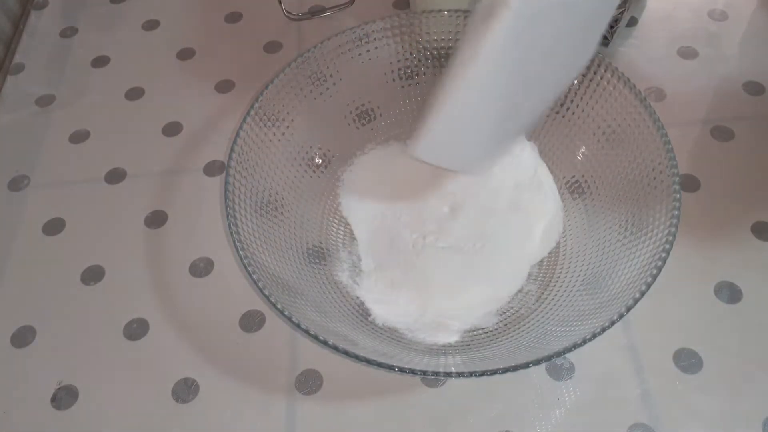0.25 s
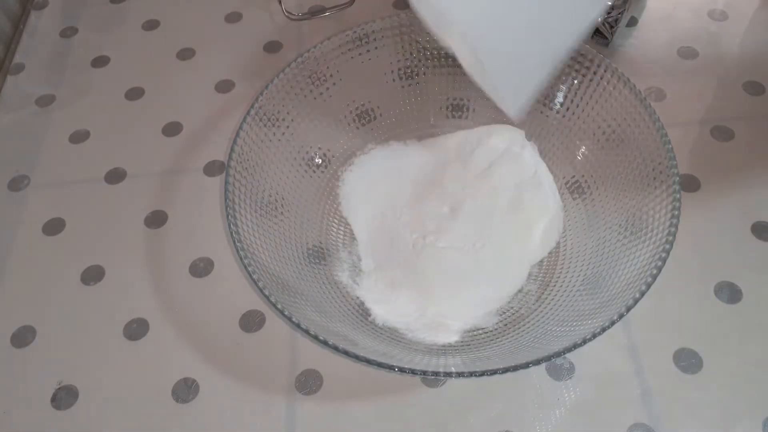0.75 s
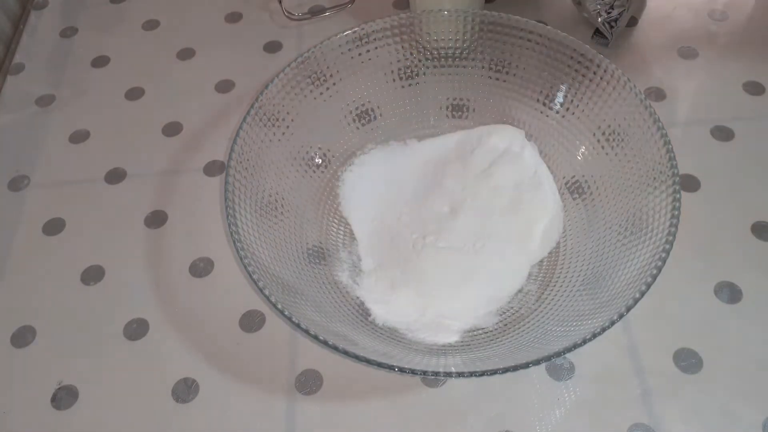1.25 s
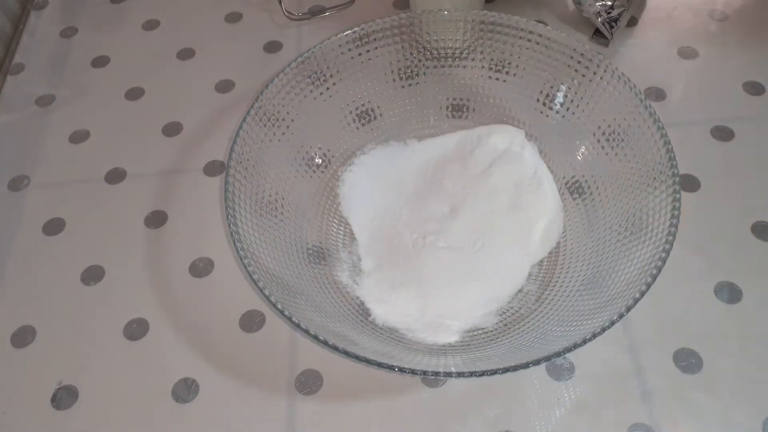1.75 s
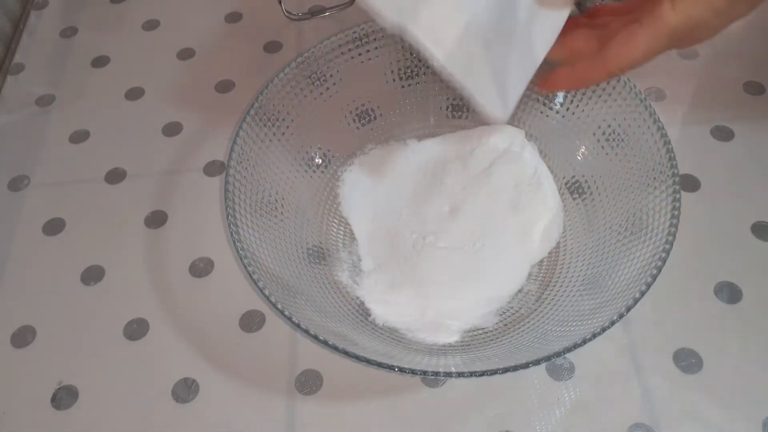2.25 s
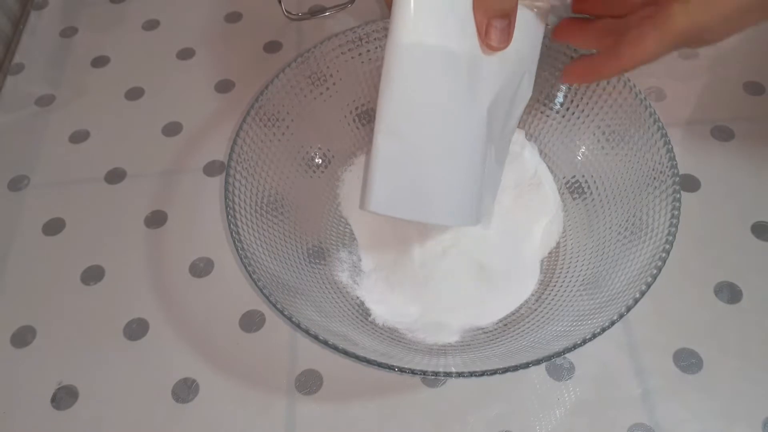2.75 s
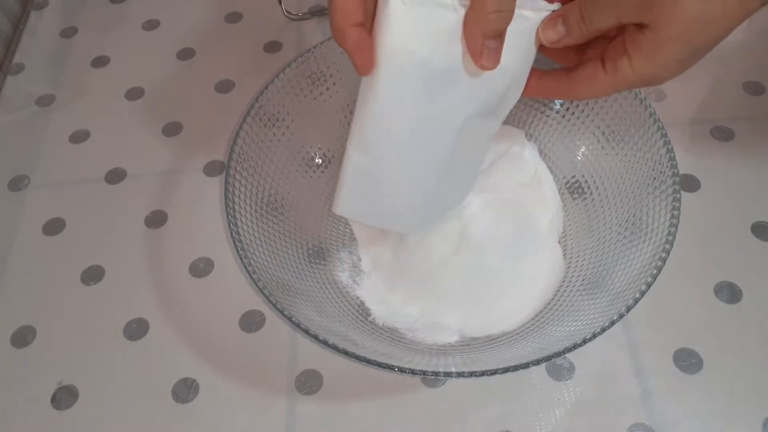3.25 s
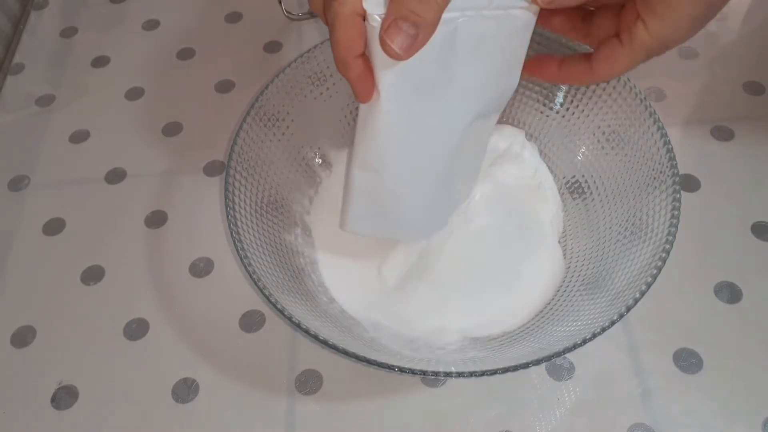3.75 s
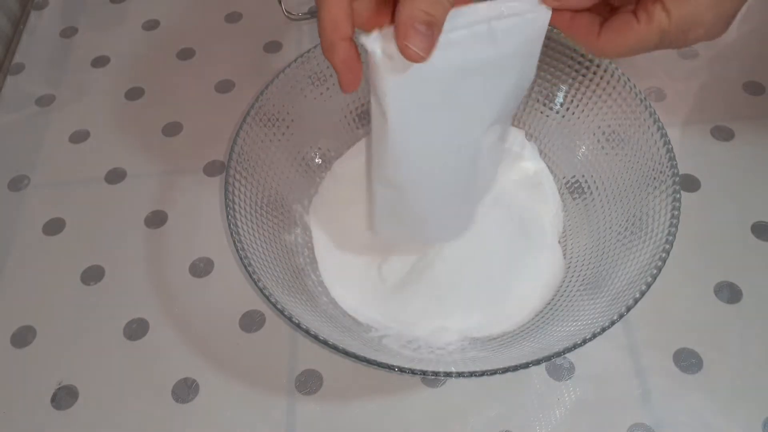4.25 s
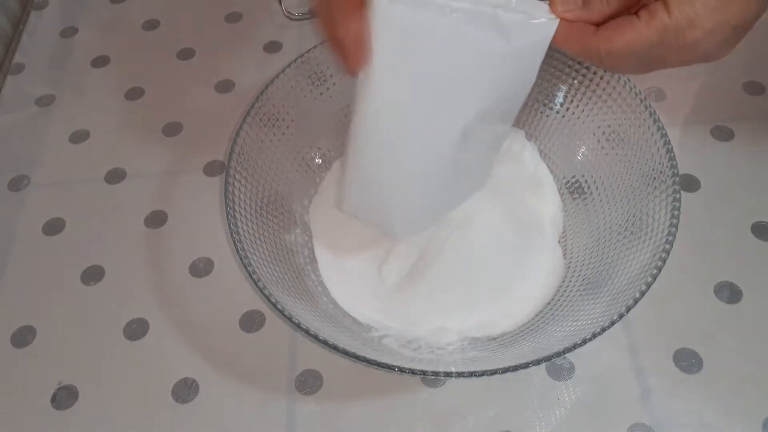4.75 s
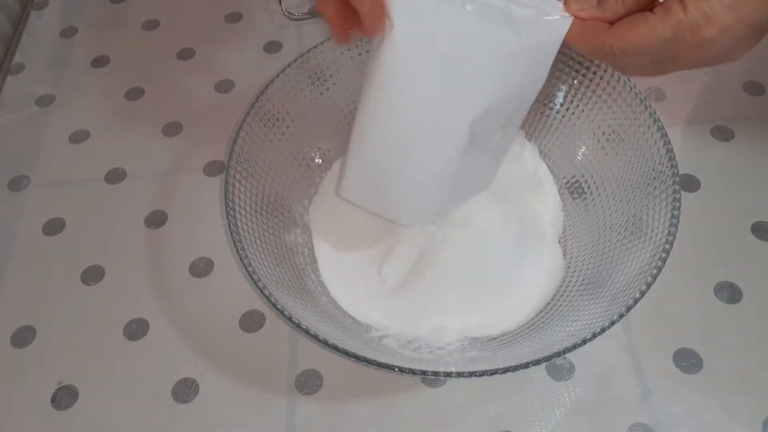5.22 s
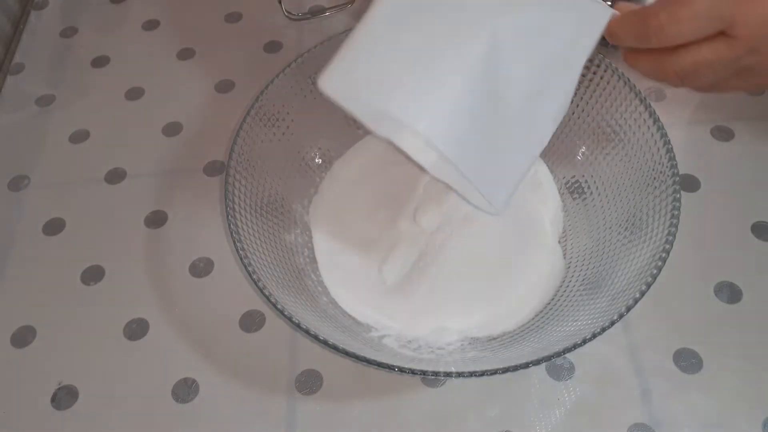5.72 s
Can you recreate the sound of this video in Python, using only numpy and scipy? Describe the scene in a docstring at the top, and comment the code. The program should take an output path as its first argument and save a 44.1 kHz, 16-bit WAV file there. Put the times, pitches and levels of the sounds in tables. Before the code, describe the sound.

A close stereo microphone in a small hard kitchen picks up stiff paper over a steady, low mains hum of about 100 Hz with soft air noise. From 0 to 0.5 s an emptied sachet gives short rubs, dull pops and a tight cluster of crisp cracks. It lands on the table at about 1.3 s, edge first with a light tick, then flat at 1.47 s with a duller pat and slight skid. A faint finger drag follows. From 1.9 s a second sachet rustles; fine powder slides briefly, then streams from 2.3 to 4.2 s as a soft, very high, fluctuating hiss dotted with small crinkles and pops. At 4.5-4.65 s a brisk cluster of pops and snaps breaks out, then spaced, louder crackles from 4.9 to 5.5 s. The strongest sharp snaps come around 5.7 s, with a few thin crackles near 5.9 s. Each snap has a short room tail.

```python
"""Stiff paper crackles: a sachet is emptied into a glass bowl on a kitchen table, a second picked up, poured, shaken out.
Creases crack as short impulses through damped panel resonances, panels pop dully, the empty sachet lands on the table.
Fingers and walls rub in runs of tiny random slips; fine powder slides out as high filtered noise.
A small hard room answers each snap with decaying noise; a mains appliance hums throughout as sines over soft air noise."""
import sys
import numpy as np
from scipy import signal
from scipy.fft import rfft, irfft, next_fast_len
from scipy.io import wavfile
from scipy.ndimage import uniform_filter1d

SR = 44100
rng = np.random.default_rng(int(sys.argv[2]) if len(sys.argv) > 2 else 0)


def store_wav(level_fs):
    """Save 16-bit WAV to argv[1]."""
    pcm = np.round(np.clip(np.atleast_2d(level_fs), -1, 1) * 32767)
    wavfile.write(sys.argv[1], SR, pcm.T.astype(np.int16))


N = 263762
TIME = np.arange(N) / SR

# Edges of a snap's body, mid, bite and top bands: (frequency [Hz])
SNAP_BANDS_HZ = np.array([200, 800, 2200, 5500, 16000])
SNAP_CENTRES_HZ = np.sqrt(SNAP_BANDS_HZ[1:] * SNAP_BANDS_HZ[:-1])
# The empty sachet lands beside the bowl, one edge and then flat:
# (time [s], level before band offsets [dB], sharpness [steps], panel resonance [Hz])
LANDINGS = [(1.3262, -37, 1.0, 5660), (1.466, -31, -0.089, 450)]


def undb(db):
    """Amplitude ratio: 20 dB is a factor of ten."""
    return 10 ** (np.asarray(db) / 20)


def along(points, size):
    """Interpolation on a logarithmic frequency axis: a (Hz, value) table read at the bins of a transform."""
    hz, value = np.transpose(points)
    bins_hz = np.fft.rfftfreq(size, 1 / SR)
    return np.interp(np.log(bins_hz + 1), np.log(hz), value)


def colour(x, points):
    """Linear filtering: the spectrum is multiplied by the gains of a (Hz, dB) table."""
    length = x.shape[-1]
    size = next_fast_len(length, True)
    return irfft(rfft(x, size) * undb(along(points, size)), size)[..., :length]


def unit(x):
    """Power normalisation: scale to rms 1."""
    return x / np.sqrt(np.mean(x ** 2))


def pair(three, apart=1):
    """Partial coherence: one shared and two separate signals mix by power into left and right."""
    # Likeness of left and right when apart is 1: (frequency [Hz], correlation [0-1])
    likeness = [(80, 0.96), (200, 0.79), (1000, 0.32), (2200, 0.19), (4500, 0), (14000, 1)]
    length = three.shape[-1]
    size = next_fast_len(length, True)
    unlike = np.clip(apart * (1 - along(likeness, size)), 0, 1)
    spectra = rfft(three, size)
    both = np.sqrt(1 - unlike) * spectra[0] + np.sqrt(unlike) * spectra[1:]
    return irfft(both, size)[:, :length]


def walk(rate):
    """Band-limited chance: normal random knots, rate per second, joined by straight lines."""
    knots = rng.standard_normal(4096)
    return np.interp(TIME * rate, np.arange(len(knots)), knots)


def add(out, s, x):
    """Superposition: mix a sound in at a time in seconds."""
    i = max(int(s * SR), 0)
    out[:, i:i + x.shape[1]] += x[:, :max(N - i, 0)]


def causal(gain):
    """Minimum phase by the folded cepstrum: the response rings after the blow, not before."""
    cepstrum = irfft(np.log(gain))
    half = len(cepstrum) // 2
    cepstrum[1:half] *= 2
    cepstrum[half + 1:] = 0
    return np.exp(rfft(cepstrum))


def appliance(pan_db=2.5, waver_db=-0.05):
    """Mains harmonics: nearly steady sines at multiples of about 50 Hz, over soft air noise."""
    # Hum partials: (frequency [Hz], mean rms level before panning [dB])
    partials = [(50, -72.5), (100.05, -56.5), (200, -87)]
    # Air noise: (frequency [Hz], level [dB per Hz])
    air_colour = [(26, -122), (38, -103), (48, -114), (64, -92), (125, -85.5), (165, -91), (220, -82.5),
                  (290, -91), (400, -98.5), (650, -93.5), (830, -104), (2200, -113), (6000, -115),
                  (16000, -117)]
    hum = 0
    for hz, db in partials:
        amplitude = np.sqrt(2) * undb(db + waver_db * walk(6.8))
        hum = hum + amplitude * np.sin(2 * np.pi * (hz * TIME + rng.random()))
    # white noise of rms 1 spreads its power over SR / 2
    air = colour(pair(rng.standard_normal((3, N))), air_colour) * np.sqrt(SR / 2)
    return hum * undb(np.array([[pan_db], [-pan_db]]) / 2) + air


def kitchen(x, gap_s=0.0065, early_db=4, early_s=0.022):
    """Reverberation: worktop and near walls answer first, then a diffuse tail that lasts longest in the bass."""
    # Decay of the late tail: (frequency [Hz], time to fall by 60 dB [s])
    decays = [(200, 0.66), (800, 0.31), (1800, 0.34), (3000, 0.35), (4800, 0.34), (8000, 0.33),
              (15000, 0.29)]
    t = TIME[:SR // 2]
    noise = rfft(pair(rng.standard_normal((3, len(t)))))
    response = 0
    for k, (_, t60) in enumerate(decays):
        # overlapping bands that sum to one
        share = along([(hz, j == k) for j, (hz, _) in enumerate(decays)], len(t))
        response = response + irfft(noise * share, len(t)) * np.exp(-np.log(1000) * t / t60)
    early = 1 + undb(early_db) * np.exp(-t / early_s)
    response = response * (t > gap_s) * early
    return signal.fftconvolve(x, unit(response) / np.sqrt(len(t)), axes=1)[:, :N]


def grains(points, scatter_db, catch_db, catch_rate):
    """Granular noise: dense tiny contacts of uneven size that come in flurries."""
    size_db = scatter_db * rng.standard_normal(N) + catch_db * walk(catch_rate)
    contacts = rng.standard_normal((3, N)) * undb(size_db)
    return unit(colour(pair(contacts), points))


def powder():
    """Granular flow: countless fine grains slide over the paper lip in a smooth, very high hiss."""
    # Sliding down the sachet, then streaming out: (time [s], flow level before a 1 dB lift [dB])
    pour = [(1.89, -81), (1.95, -54.5), (2.02, -58.5), (2.1, -80), (2.32, -77), (2.41, -56.5), (2.5, -52),
            (2.68, -48.5), (2.84, -54), (3.08, -50), (3.29, -58.5), (3.44, -45), (3.53, -55.5),
            (3.62, -49.5), (3.8, -59), (4.05, -57.5), (4.254, -94)]
    # Relative colour of the hiss: (frequency [Hz], level [dB per Hz])
    hiss_colour = [(300, -4), (1200, -18), (2800, -20.5), (4200, -10.5), (6500, -4.5), (9000, -2),
                   (12500, 0), (16000, 0.5)]
    s, db = np.transpose(pour)
    flow = undb(np.interp(TIME, s, db, left=-120, right=-120))
    return undb(1.0) * flow * grains(hiss_colour, scatter_db=-1.0, catch_db=1.7, catch_rate=27)


def drags(width=0.3):
    """Stick-slip: a dry fingertip on a taut panel slips in quick steps and keeps one resonance humming."""
    # Fingertip drags: (time [s], length [s], panel resonance [Hz], rms level before its swell and fade [dB])
    fingertips = [(1.623, .13, 2670, -61), (4.511, 0.074, 1920, -49.5)]
    out = np.zeros((2, N))
    for s, length, hz, db in fingertips:
        slips = pair(rng.standard_normal((3, int(length * SR))))
        edges_hz = hz * np.exp([-width, width])
        resonance = signal.butter(2, edges_hz, "bandpass", fs=SR, output="sos")
        ring = signal.sosfilt(resonance, slips)
        add(out, s, undb(db) * unit(ring) * np.hanning(ring.shape[1]))
    return out


def strokes():
    """Pressure-dependent friction: a light touch only hisses, a firm one sounds the whole pouch.

    Yields every rub and skid as (s, length, levels of body, mid and top)."""
    # Paper on paper and fingers: (time [s], length until the fade [s], pressure level [dB])
    rubs = [ (0.0, 0.012, -53.5), (0.097, 0.038, -51), (0.271, 0.027, -44), (0.423, 0.044, -46.5),
            (0.74, 0.041, -64.5), (0.934, 0.077, -83), (1.043, 0.1, -68), (2.053, 0.097, -64.5),
            (3.036, 0.19, -67.5), (3.4, 0.21, -66), (3.745, 0.16, -63.5), (3.898, 0.061, -61.5),
            (4.01, 0.1, -66), (4.182, 0.072, -65.5), (4.386, 0.055, -59.5), (4.611, 0.047, -51.5),
            (4.76, 0.022, -56), (4.887, 0.018, -52), (5.039, 0.015, -47.5), (5.609, 0.037, -62.5),
            (5.8, 0.095, -69.5)]
    reference_db = -60
    layers_db = np.array((-59, -61, -59))  # body, mid, top at the reference pressure
    growth = np.array((1.23, 0.91, 0.43))  # dB per dB of pressure
    for s, length, db in rubs:
        yield s, length, layers_db + growth * (db - reference_db)
    # the paper brushes the table just before it lands, and skids on
    skid_lead_s, skid_s = 0.01, 0.091
    skid_db = np.array((-17, -15.5, -39))  # body, mid, top relative to the landing
    for s, db, _, _ in LANDINGS:
        yield s - skid_lead_s, skid_s, db + skid_db


def rubbing(rise_share=0.3, fall_share=0.37):
    """Friction noise: runs of tiny slips sound pouch, panels and surface; longer strokes swell and fade slower."""
    # Relative colours of the pouch, its panels and its surface: (frequency [Hz], level [dB per Hz])
    body_colour = [(90, -10), (180, 4.5), (500, 5), (750, 2.5), (1300, -9), (4000, -20.5)]
    mid_colour = [(350, -21.5), (800, -10), (1400, 1.5), (2300, -4), (3500, -7.5), (6000, -14.5),
                  (14000, -26)]
    top_colour = [(1500, -8), (4000, -3.5), (6500, -2.5), (10000, -0.5), (16000, -8.5)]
    layers = np.array([grains(body_colour, scatter_db=4.5, catch_db=1.5, catch_rate=150),
                       grains(mid_colour, scatter_db=9.0, catch_db=-2.0, catch_rate=550),
                       grains(top_colour, scatter_db=8.5, catch_db=4.5, catch_rate=430)])
    pressure = np.zeros((3, N))
    for s, length, db in strokes():
        progress = (TIME - s) / length
        rise = np.clip(progress / rise_share, 0, 1)
        fall = np.exp(-np.clip(progress - 1, 0, 20) / fall_share)
        pressure += undb(db)[:, None] * rise * fall
    return np.sum(layers * pressure[:, None], axis=0)


def panel(band_db, panel_hz, panel_db=8, panel_width=0.2, size=2048):
    """Damped resonance: spectrum of a paper panel when a crease in it gives way."""
    hz = np.fft.rfftfreq(size, 1 / SR)
    density_db = band_db - 10 * np.log10(np.diff(SNAP_BANDS_HZ))
    resonance_db = panel_db / (1 + (np.log((hz + 1) / panel_hz) / panel_width) ** 2)
    gain = undb(along(np.c_[SNAP_CENTRES_HZ, density_db], size) + resonance_db)
    # a small sheet radiates little bass
    radiation = (hz + 10) ** 2 / (hz ** 2 + 150 ** 2)
    return causal(gain * radiation)


def buckle(run_s=0.00078, uneven_db=5, size=2048):
    """Broadband excitation: uneven slips run along a crease in a millisecond or two, feeding all frequencies alike."""
    t = np.arange(size) / SR
    force = np.sqrt(t) * np.exp(-t / (2 * run_s)) * undb(uneven_db * rng.standard_normal(size))
    slips = rfft(pair(rng.standard_normal((3, size)) * force, apart=0.86))
    smooth_power = uniform_filter1d(np.mean(abs(slips) ** 2, axis=0), size=45)
    return slips / np.sqrt(smooth_power)


def snap(spectrum, band_db, span_s=0.0035, size=1024):
    """Energy scaling: one snap as a wave with the energy of its summed band powers held for a few milliseconds."""
    wave = irfft(spectrum)[:, :size]
    energy = np.sum(undb(band_db) ** 2) * span_s * SR
    return wave * np.sqrt(energy / np.sum(wave ** 2, axis=1, keepdims=True))


def crack_bands(db, sharpness):
    """Spectral tilt: a crack is broadband; a sharper crease trades body for top."""
    # Body, mid, bite and top: (offset [dB])
    offsets_db = (-8, -2, 1.12, -3.5)
    # What one step of sharpness adds to each: (change [dB])
    step_db = (-2, 0, 0.25, 3.5)
    return db + np.array(offsets_db) + sharpness * np.array(step_db)


def pop_bands(db, panel_hz, below_db_per_oct=-9, above_db_per_oct=-11):
    """Resonant radiation: a dull pop falls away on both sides of the panel's resonance."""
    octaves = np.log2(SNAP_CENTRES_HZ / panel_hz)
    fall_db = abs(octaves) * np.where(octaves < 0, below_db_per_oct, above_db_per_oct)
    return db + fall_db - fall_db.max()


def snaps():
    """Sudden buckling: every crack, pop and landing as (s, band levels, panel resonance, room share)."""
    # Creases cracking: (time [s], level before band offsets [dB], sharpness [steps],
    # panel resonance [Hz], room share [dB])
    cracks = [ (0.2754, -40, -0.6, 480, -3.5), (0.4366, -37, 4.5, 1280, -8.5),
              (0.4645, -34.5, 3.5, 4800, -6), (0.5023, -32.5, 1.55, 6240, -5.5),
              (2.104, -44.5, -2.5, 2030, -4.5), (2.1233, -47.5, 2, 3720, -20),
              (2.304, -66.5, 2.5, 5030, -3), (2.4966, -65, 2.5, 1190, 6), (2.7614, -47, 3.5, 1120, 3),
              (3.845, -40, -2.3, 1550, -6), (4.0354, -44.5, 1.5, 2140, -0.5), (4.356, -79, 9, 7440, -9),
              (4.4072, -55, 4, 2460, -2), (4.5937, -50.5, 4.5, 3540, 1.5), (4.602, -32.5, -1.5, 760, -8.5),
              (4.9391, -38.5, -3.5, 720, -6.5), (5.0547, -27, 0.1, 1350, -7), (5.19, -33, -1.3, 2750, -2.5),
              (5.2848, -31.5, -0.54, 2900, -5), (5.325, -43.5, 0, 3800, -10),
              (5.4295, -29.5, -1.7, 5400, -4.5), (5.4841, -32, -1.4, 1880, -10.5),
              (5.6773, -25.5, 2.5, 1480, -5.5), (5.6993, -31.5, 1, 1660, -4), (5.8708, -53, 4.5, 5640, -9),
              (5.885, -41.5, 3, 5900, -8.5)]
    # Panels popping in or out: (time [s], level of the strongest band [dB], panel resonance [Hz])
    pops = [ (0.122, -45.5, 1250), (0.146, -38, 1020), (0.183, -48.5, 1950), (0.2827, -36.5, 1350),
            (0.429, -30, 1350), (0.477, -36.5, 1250), (1.9574, -50.5, 1340), (2.4543, -47.5, 1270),
            (2.8464, -45.5, 840), (3.144, -49.5, 1310), (3.2124, -43, 1550), (3.46, -52.5, 1150),
            (3.562, -54.5, 1070), (3.7701, -38, 1680), (3.928, -50.5, 1510), (4.5134, -42, 1030),
            (4.5793, -30, 1570), (4.61, -31.5, 1000), (4.6349, -43, 634), (5.6676, -35, 1730),
            (5.6924, -23.5, 1550)]
    pop_room_db, landing_room_db = -8.5, 1
    # a panel gives way just before its crease cracks
    give_lead_s, give_db, give_hz = 0.0044, -14, 1750
    for s, db, sharpness, hz, room_db in cracks:
        yield s - give_lead_s, pop_bands(db + give_db, give_hz), give_hz, pop_room_db
        yield s, crack_bands(db, sharpness), hz, room_db
    for s, db, hz in pops:
        yield s, pop_bands(db, hz), hz, pop_room_db
    for s, db, sharpness, hz in LANDINGS:
        yield s, crack_bands(db, sharpness), hz, landing_room_db


def creases():
    """Directivity: the microphone hears the slips of one panel, the room the smooth blend of all directions."""
    direct, thrown = np.zeros((2, N)), np.zeros((1, N))
    for s, band_db, panel_hz, room_db in snaps():
        resonance = panel(band_db, panel_hz)
        add(direct, s, snap(buckle() * resonance, band_db))
        add(thrown, s, undb(room_db) * snap(resonance[None], band_db))
    return direct, thrown


def from_left(x, lag_s=0.000014):
    """Path difference: the sachet lies a little nearer to the left port, so the right one hears it later."""
    size = next_fast_len(N, True)
    delay = np.exp(-2j * np.pi * np.fft.rfftfreq(size, 1 / SR) * lag_s)
    right = irfft(rfft(x[1], size) * delay, size)[:N]
    return np.array([x[0], right])


def scene():
    """Superposition of direct and reverberant sound: paper and powder close by, the room and hum around them."""
    direct, thrown = creases()
    rustle = rubbing() + drags() + powder()
    to_room = thrown + undb(-5.5) * rustle[:1]
    return from_left(direct + rustle) + kitchen(to_room) + appliance()


def record(dry):
    """Port resonance: the microphone port lifts part of the treble; a steep low-pass cuts the top."""
    # Microphone response: (frequency [Hz], gain [dB])
    port_response = [(5000, -0.5), (6800, -0.5), (8400, 3.5), (9900, -5.5), (12000, -2.5), (15500, -8.5)]
    top_hz = 15950
    low_pass = signal.ellip(8, 0.2, 70, top_hz, fs=SR, output="sos")
    return signal.sosfilt(low_pass, colour(dry, port_response))


dry = scene()
out = record(dry)
store_wav(out)
```